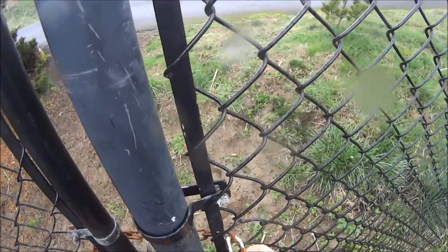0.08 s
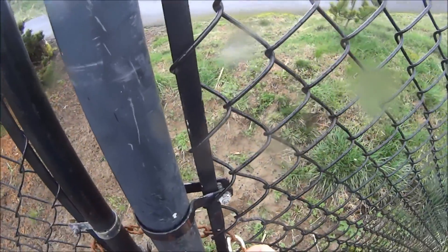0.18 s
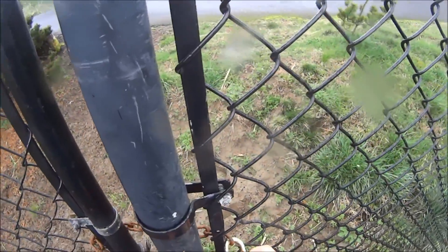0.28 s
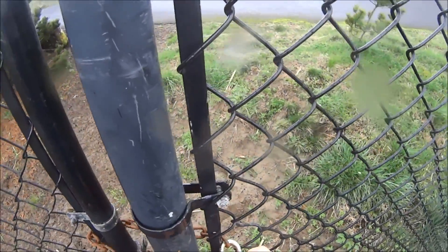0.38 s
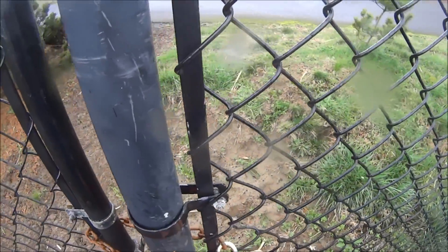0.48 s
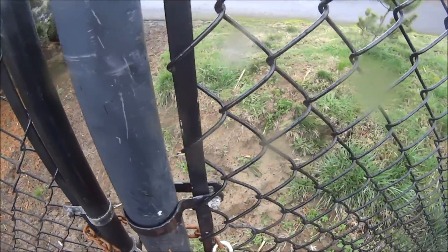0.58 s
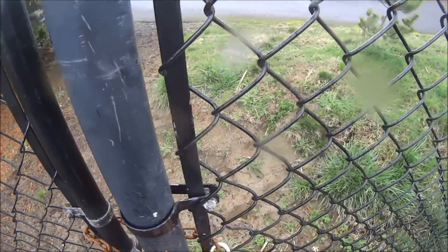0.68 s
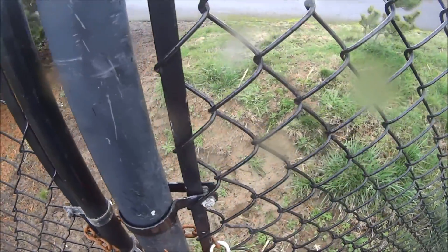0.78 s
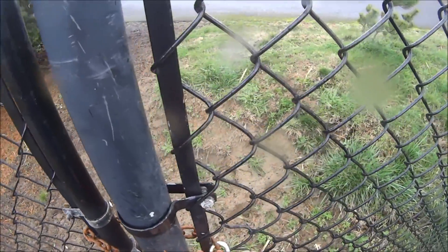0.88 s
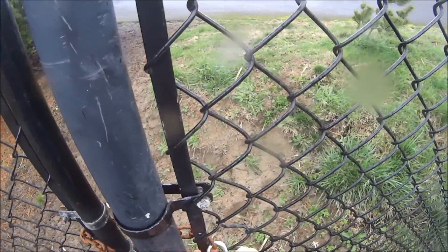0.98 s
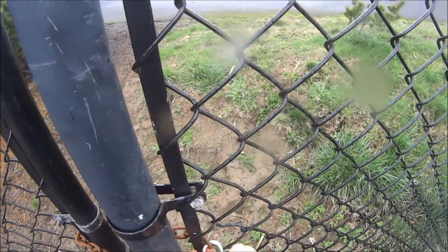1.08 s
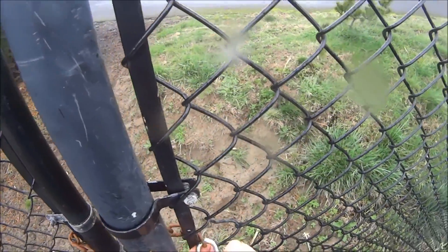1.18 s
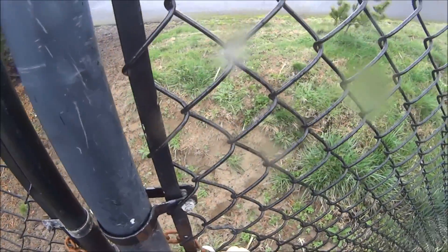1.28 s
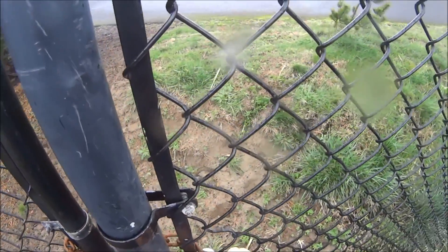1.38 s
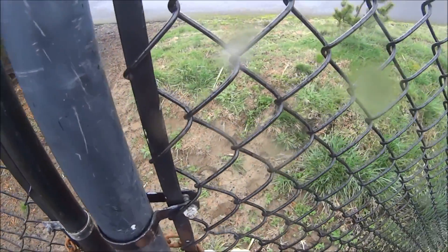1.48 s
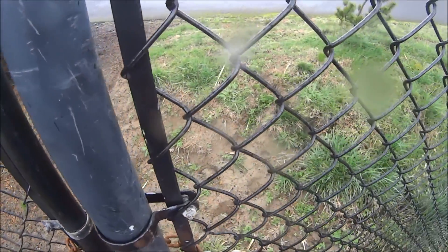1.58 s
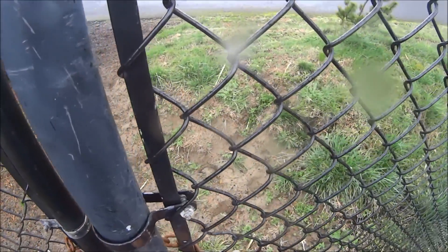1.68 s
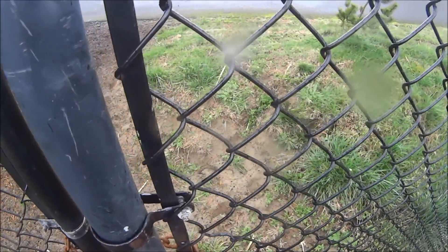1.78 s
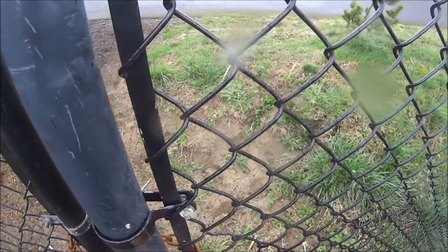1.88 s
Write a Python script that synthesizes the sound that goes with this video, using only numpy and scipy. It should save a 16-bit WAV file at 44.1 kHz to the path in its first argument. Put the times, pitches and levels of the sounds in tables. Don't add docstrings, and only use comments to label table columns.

```python
import sys
import numpy as np
from scipy import signal
from scipy.fft import rfft, irfft
from scipy.io import wavfile
from scipy.ndimage import uniform_filter1d

SR = 44100
rng = np.random.default_rng(int(sys.argv[2]) if len(sys.argv) > 2 else 0)


def wrap_up_sound(samples):
    columns = np.atleast_2d(samples).T
    tamed = np.clip(columns, -1, 1)
    steps = np.round(tamed * 32767).astype(np.int16)
    wavfile.write(sys.argv[1], SR, steps)


def invert_db(level):
    return 10 ** (np.asarray(level, dtype=float) / 20)


N = 83790

# f/Hz, level/dB, t60/s
FIRST_LINK_MODES = [(2336, -9, .075), (2450, -17, .05), (2611, -16, .05), (2765, -18, .04),
                    (2853, -18, .05), (3480, -24, .035), (3822, -16, .04), (4856, -14, .022),
                    (5868, -20, .035), (6350, -3, .125), (6557, 0, .045), (6876, -9, .03), (7475, -9, .03),
                    (8559, -14, .035)]


def read(points, hz):
    f, value = np.transpose(points)
    return np.interp(np.log(hz + 1), np.log(f + 1), value)


def evened(x):
    return x / np.sqrt(np.mean(x ** 2) + 1e-20)


def highpass(x, order, hz):
    return signal.sosfilt(signal.butter(order, hz, "high", fs=SR, output="sos"), x)


def add(mix, s, pan_db, sound):
    start = max(round(s * SR), 0)
    part = mix[:, start:][:, :len(sound)]
    sides = np.array([[.5], [-.5]]) * np.clip(pan_db, -12, 12)
    part += invert_db(sides) * sound[:part.shape[1]]


def ring(modes, extra_db, push_s, size):
    hz, db, t60 = np.transpose(modes)[:, :, None]
    t = np.arange(size) / SR
    wobble = uniform_filter1d(rng.standard_normal((len(hz), size)), size=200, axis=1)
    shake = 1 + .28 * evened(wobble)
    decay = invert_db(db + extra_db[:, None] - 60 * t / t60)
    x = shake * decay * np.sin(2 * np.pi * (hz * t + 0.39 * rng.random(hz.shape)))
    return x.sum(0) * (1 - np.exp(-t / push_s))


def burst(hz, octaves, skirt_db, t60, size=1024):
    f, t = np.fft.rfftfreq(size, 1 / SR) + 1, np.arange(size) / SR
    hump = np.exp(-.5 * (np.log2(f / hz) / octaves) ** 2)
    skirt = invert_db(skirt_db) * f ** 4 / (f ** 4 + 490.0 ** 4)
    x = irfft(rfft(rng.standard_normal(size)) * (hump + skirt), size)
    x = x * invert_db(-60 * t / t60) * np.minimum(t / 0.00033, 1)
    return x / abs(x).max()


def noise(spectrum, same, patchy_db):
    frames, hz = N // 256 + 5, np.fft.rfftfreq(1024, 1 / SR)
    a, b, c, d, patches = rng.standard_normal((frames, 513, 5)).T
    patches = uniform_filter1d(uniform_filter1d(patches, size=10, axis=0), size=12, axis=1)
    same = np.clip(same * np.ones(513), -1, 1)[:, None]
    left, other = a + 1j * b, c + 1j * d
    z = np.array([left, same * left + np.sqrt(1 - same ** 2) * other])
    z = z * invert_db(read(spectrum, hz)[:, None] + patchy_db * evened(patches))
    return evened(signal.istft(z, nperseg=1024, noverlap=768)[1][:, :N])


def far_air():
    air_spectrum = [(60, -42), (100, -7), (541, -3.5), (2210, -6.5), (4260, -12.5), (10800, -17),
                    (12000, -34)]
    likeness = [(100, 0.61), (400, -0.47), (4000, -0.14)]
    same = read(likeness, np.fft.rfftfreq(1024, 1 / SR))
    return invert_db(-55) * noise(air_spectrum, same, patchy_db=1.5)


def light_wind():
    wind_spectrum = [(10, -1), (28, -4), (45, -6.5), (80, -19), (130, -28), (250, -34.5)]
    # t/s, level/dB
    gusts = [
        (0, 6),
        (.6, 0),
        (.9, 1.5),
        (1.2, 1.5),
        (1.9, -1.5),
    ]
    gust_db = np.interp(np.arange(N) / SR, *np.transpose(gusts))
    return invert_db(-60 + gust_db) * noise(wind_spectrum, .99, patchy_db=1.6)


def wire_ticks():
    mix = np.zeros((2, N))
    ticks = [(0.0044, -24, 7800), (0.02, -33, 5040), (0.034, -22, 5100), (0.053, -24.5, 11000),
             (0.0749, -18.5, 4730), (0.0878, -23, 9880), (0.122, -33, 7500), (0.169, -30, 7360),
             (0.182, -26, 7300), (0.2316, -17, 8840), (0.2439, -9, 5480), (0.282, -17.5, 8700),
             (0.409, -24, 6460), (0.4209, -22, 6500), (0.5357, -27, 6700), (0.7345, -35, 4730),
             (0.8324, -35, 5550), (0.9022, -27, 6950), (1.0294, -26.5, 4330), (1.123, -12.5, 4500),
             (1.173, -20.5, 10500),
             (0.7165, -24.5, 3100),
        (0.783, -22, 3500),
        (1.3253, -12, 3500),
        (1.4922, -33.5, 4300),
             (0.209, -33, 5490), (0.312, -32, 5000), (0.4166, -26, 6000), (0.4459, -30, 4970),
             (0.454, -33, 8500), (0.5453, -35, 7000), (0.557, -34, 5000), (0.605, -44, 4500),
             (0.6234, -36, 4500), (.6385, -45, 5000), (0.664, -41, 4200), (0.678, -36, 3930),
             (.7585, -47, 3000), (.8839, -34, 3770), (0.929, -41, 4300), (1.05, -17, 5180),
             (1.078, -35, 4500), (1.115, -44, 6000), (1.1747, -15.5, 4260), (1.201, -35, 6000),
             (1.4735, -43, 4830), (1.5383, -34, 5860), (1.5577, -31, 4770), (1.568, -38, 4500),
             (1.643, -31, 4380), (1.6755, -44, 6000), (1.6911, -45, 5500), (1.702, -44, 6000),
             (1.731, -28, 4620), (1.8253, -25, 4500), (1.837, -31.5, 4280), (1.844, -38, 4770),
             (1.895, -39, 4500)]
    for s, db, hz in ticks:
        pan_db = 2.3 * rng.standard_normal()
        add(mix, s, pan_db, invert_db(db - 3.5) * burst(hz, .38, -17, 0.0086))
    return mix


def wire_patter():
    # t/s, rattle level/dB
    handling = [
        (0, -47.5),
        (.3, -50),
        (.6, -55.5),
        (.9, -58),
        (1.25, -50),
        (1.42, -64.5),
        (1.75, -68.5),
    ]
    scrape = [(600, -2), (1500, 5.5), (2380, 7.5), (3200, -6), (10000, -8.5)]
    grains_per_s, spread_db = 550, 3.5
    size = invert_db(spread_db * np.minimum(rng.exponential(1, N), 4)) * (rng.random(N) < grains_per_s / SR)
    kind = rng.integers(0, 16, N)
    patter = np.zeros((2, N))
    for k, hz in enumerate(np.geomspace(750, 10000, num=16)):
        grain = evened(burst(hz, 0.49, -51, 0.018)) * np.sqrt(hz) * invert_db(read(scrape, hz))
        add(patter, 0, rng.normal(0, 4), signal.oaconvolve(size * (kind == k), grain)[:N])
    hand_db = np.interp(np.arange(N) / SR, *np.transpose(handling))
    return evened(patter) * invert_db(hand_db - 2.0)


def drags():
    mix = np.zeros((2, N))
    # t/s, length/s, level/dB, centre f/kHz
    pulls = [
        (0, 0.099, -49.5, 6.6),
        (0.198, 0.092, -54, 4.9),
        (0.869, 0.08, -50.5, 2),
        (1.172, 0.031, -39, 3.04),
        (1.821, 0.035, -55, 2.2),
    ]
    slips_per_s = 3000
    mid = abs(np.transpose(FIRST_LINK_MODES)[0] - 4200) < 1200
    song = ring(FIRST_LINK_MODES, -9.0 * mid, 0.0005, size=6000)
    song = song / np.linalg.norm(song)
    for s, length, db, khz in pulls:
        chance = rng.random((3, 6000))[:, :round(length * SR)]
        slips = (chance[0] < slips_per_s / SR) * chance[1] ** -.22 * np.sign(chance[2] - .5)
        slips = slips * np.sin(np.pi * np.linspace(.08, 1, num=len(slips))) ** 0.23
        slips = slips / np.sqrt(np.mean(slips ** 2))
        hiss = burst(khz * 1000, .6, -30, 0.0013)
        add(mix, s, 0, invert_db(db) * signal.oaconvolve(slips, hiss / np.linalg.norm(hiss)))
        song_db = db - 17.5 + 1.5 * khz
        add(mix, s, 0, invert_db(song_db) * signal.oaconvolve(slips, song))
    return mix


def post():
    mix = np.zeros((2, N))
    # t/s, peak/dB, strongest pitch/octaves over 1 kHz, left-right/dB
    knocks = [(0.067, -38.5, 0.95, 12), (.076, -28, 0.83, 1.5), (.105, -36.5, 0.013, -0.5),
              (.157, -35, 0.073, 2), (.24, -26.5, 0.73, 1), (.251, -23, 0.012, -3.5), (.342, -38, 1, 2),
              (.556, -40, 1, -7), (0.622, -39.5, 0.9, -8), (.678, -26.5, -0.0058, 0), (.717, -36.5, 1, -3),
              (.736, -40, 0.77, -4), (0.784, -23, 0.11, -2), (.895, -37, 0.58, 3),
              (.928, -38.5, 0.84, -2.5), (1.001, -47.5, -0.31, -6), (1.096, -40, 0.082, 0),
              (1.133, -41, -0.26, -3), (1.21, -35, 0.73, -4), (1.357, -38, 0.061, 4),
              (1.474, -27.5, 0.13, -5),
        (1.538, -29, 0.53, 0.5),
        (1.5584, -22.5, 0.58, -3),
        (1.582, -40.5, 1.35, 2),
        (1.644, -38.5, 0.54, 1.5),
        (1.692, -36.5, 0.68, -2.5),
        (1.731, -36.5, 0.21, 0.5),
        (1.756, -38, 0.12, -0.5),
        (1.878, -43.5, 0.043, -4),
              (0.449, -40, 0.15, -4), (0.492, -38, 0.32, -8), (.507, -38.5, 0.29, -2), (.639, -42, 0.16, 0),
            (.666, -47, -0.47, -1), (.71, -40, 1.1, -2), (.726, -39.5, 0.053, -1), (.758, -46, 0.36, 2),
            (.82, -45.5, 0.1, -3), (.844, -46, 0.52, -2), (0.948, -46, 0.55, -2), (.973, -45.5, 0.047, 0),
            (1.167, -41, 0.42, 1), (1.295, -52, 0.17, 2), (1.492, -42, 0.72, -3), (1.525, -51, .7, -4),
            (1.675, -45.5, 0.45, 4), (1.702, -44, 0.88, -4), (1.744, -49, 0.48, 0), (1.817, -47, 0.56, 0)]
    tube = np.array([(689, -10, 0.035), (829.6, -4.5, 0.024), (945, -5, 0.0098), (1257, 0, 0.013),
                     (1538, 0, 0.014), (1677, -6.5, 0.024), (2226, 3.5, 0.016), (2714, -4, 0.011),
                     (4500, 0, 0.007)])
    hz = tube[:, 0]
    for s, db, octave, pan_db in knocks:
        chance = rng.standard_normal((2, len(hz)))
        modes = tube.copy()
        modes[:, 0] *= 1 + .02 * chance[0]
        focus_db = 10.5 * np.exp(-.5 * ((np.log2(hz / 1000) - octave) / .36) ** 2)
        x = ring(modes, focus_db + 2 * chance[1], .0018, size=3000)
        add(mix, s, pan_db, invert_db(db + 4.5) * x / abs(x).max())
        add(mix, s, pan_db, invert_db(db - 15) * burst(4000, 0.22, -22.0, 0.022))
    return mix


def links():
    mix = np.zeros((2, N))
    # t/s, low ring/dB, high ring/dB, crack/dB
    first_hits = [
        (0.37, -16.5, -22, -18),
        (0.4755, -18, -17, -12),
        (0.5008, -23, -24, -19),
        (0.5704, -41.5, -70, -57),
        (0.6504, -45, -51, -50),
        (0.8759, -39, -58, -47),
        (0.883, -60, -53, -60),
        (0.9048, -35, -50, -52),
    ]
    second_hits = [
        (1.0505, -29.5, -64, -34.5),
        (1.1852, -29.5, -25, -27),
        (1.3259, -21.5, -39.5, -31),
        (1.8257, -41.5, -77, -38),
        (1.8432, -41, -73, -44),
    ]
    second_modes = [(2239, 4, 0.098), (2304, 4, 0.066), (2430, -1, 0.09), (2694, -0.5, 0.048),
                    (3160, 0, 0.027), (4020, -2.5, 0.066), (6355, -11, 0.089), (7400, -20, 0.032)]
    split_hz, crack_modes_hz = 5400, 3000
    for hits, modes in ((first_hits, FIRST_LINK_MODES), (second_hits, second_modes)):
        hz, db, _ = np.transpose(modes)
        low = hz < split_hz
        cracked = low & (hz > crack_modes_hz)
        for s, low_db, high_db, crack_db in hits:
            extra_db = np.where(low, low_db - db[low].max(), high_db + 3.5 - db[~low].max())
            extra_db = extra_db + cracked * (crack_db - low_db - 3.0)
            extra_db = extra_db + 2 * rng.standard_normal(len(hz))
            add(mix, s, 0, ring(modes, extra_db, 0.00059, size=9000))
            add(mix, s, 0, invert_db(crack_db + 4.0) * burst(3900, .6, -14, .022, size=2048))
    return mix


def latch():
    mix = np.zeros((2, N))
    latch_modes = [(490, -24, 0.035), (652, -20, 0.049), (954, -17.5, 0.031), (1320, -7, 0.015),
                   (1700, -12.5, 0.031), (2218, 0, 0.017), (3210, -2, 0.011), (4500, -3, 0.0083),
                   (5650, -15, 0.0091)]
    x = ring(latch_modes, np.zeros(len(latch_modes)), 0.0019, size=4000)
    x = highpass(x, 3, 400)
    add(mix, 1.1228, -1.5, invert_db(-11.5) * x / abs(x).max())
    return mix


def thump():
    mix = np.zeros((2, N))
    u = np.arange(600) / SR * 462 * 2 * np.pi
    push = (1 - u) * np.exp(-u)
    body_ring = 1.4 * np.sin(3.05 * u) * np.exp(-.4 * u)
    add(mix, 1.7955, 2, invert_db(-24) * (push + body_ring))
    return mix


def scattered(metal):
    echo_db, echo_t60_s = -10.5, 0.054
    tail = rng.standard_normal((2, 4000)) * invert_db(-60 * np.arange(4000) / SR / echo_t60_s)
    tail = tail / np.linalg.norm(tail[0])
    return metal + invert_db(echo_db) * signal.fftconvolve(metal, tail, axes=1)[:, :N]


def at_two_ports(metal):
    ports = np.array([(493, 2.39, 1), (1290, 0.81, 1), (2420, 0.75, 2.5), (4380, 0.21, -1.5),
                      (8700, 0.65, -0.5)])
    hz, half = np.fft.rfftfreq(N, 1 / SR), np.array([[.5], [-.5]])
    turn = np.exp(1j * half * read(ports[:, :2], hz))
    balance = invert_db(half * read(ports[:, ::2], hz))
    return irfft(rfft(metal) * turn * balance, N)


def scene():
    background = far_air() + light_wind()
    mesh = wire_ticks() + wire_patter() + drags() + post() + links()
    mesh = highpass(mesh, 4, 560)
    metal = mesh + latch() + thump()
    return at_two_ports(scattered(metal)) + background


def band_limit(x):
    return signal.sosfilt(signal.butter(12, 15700, fs=SR, output="sos"), x)


def record(dry):
    # t/s, peak/dB
    snaps = [
        (.2817, -52),
        (.623, -70),
        (1.049, -47),
        (1.173, -55),
    ]
    low = signal.oaconvolve(dry, signal.firwin(255, 11147, window=("kaiser", 8), fs=SR)[None], "same")
    skirt = signal.oaconvolve(dry, signal.firwin(63, 12000, fs=SR)[None], "same")
    heard = low + invert_db(-25) * (skirt - low)
    for s, db in snaps:
        add(heard, s, -6.0, invert_db(db) * burst(12000, 0.15, -60, 0.0071))
    return band_limit(heard)


dry = scene()
out = record(dry)
wrap_up_sound(out)
```